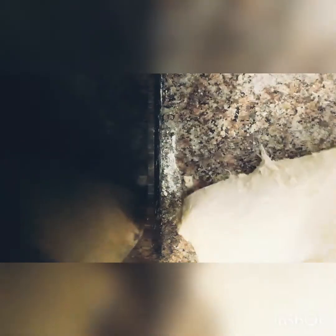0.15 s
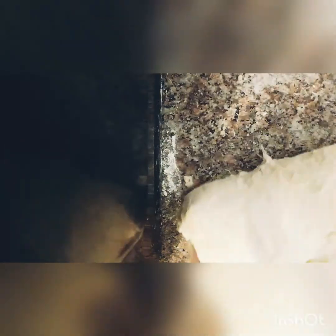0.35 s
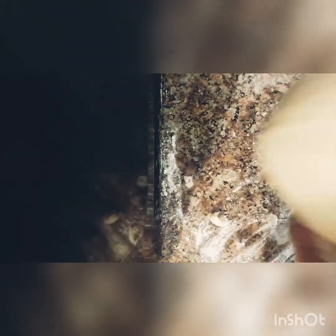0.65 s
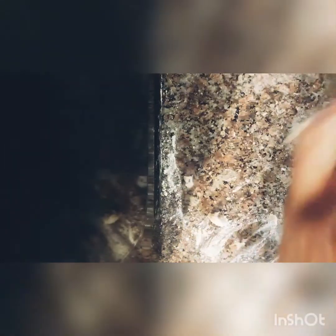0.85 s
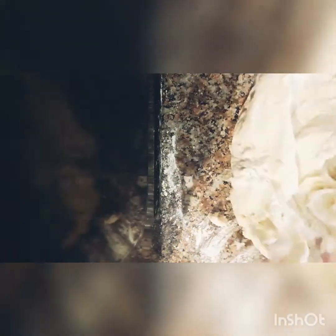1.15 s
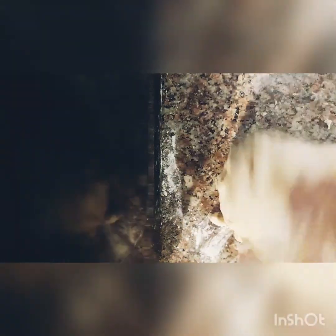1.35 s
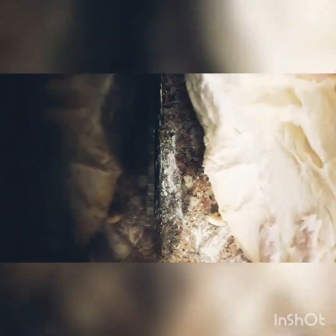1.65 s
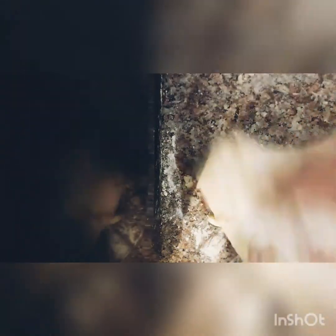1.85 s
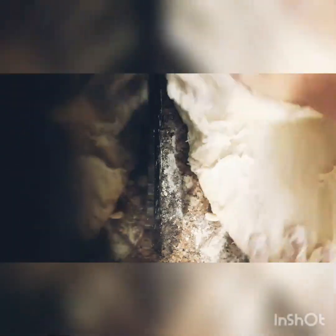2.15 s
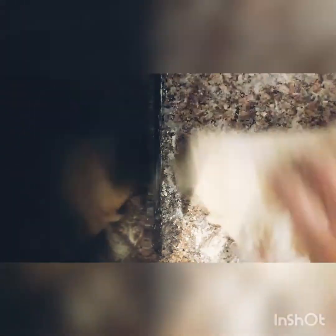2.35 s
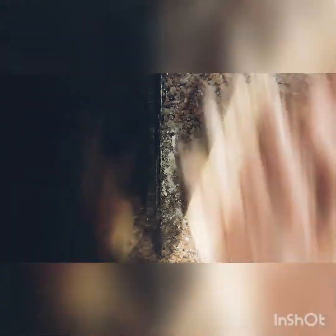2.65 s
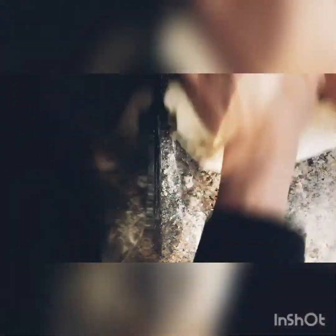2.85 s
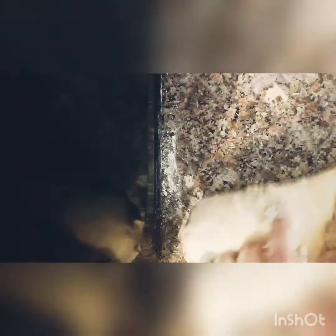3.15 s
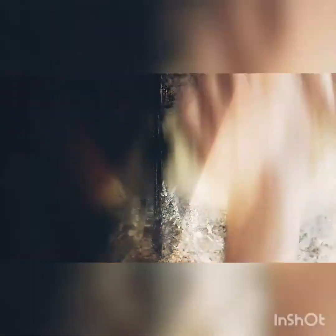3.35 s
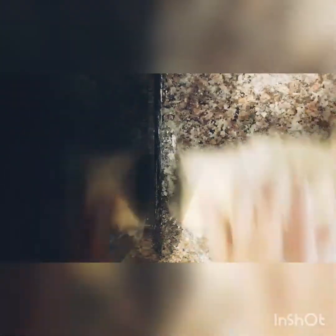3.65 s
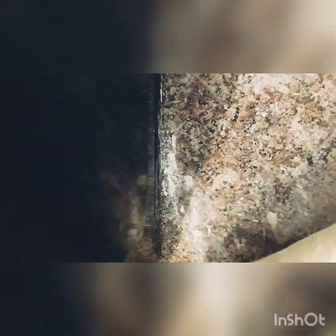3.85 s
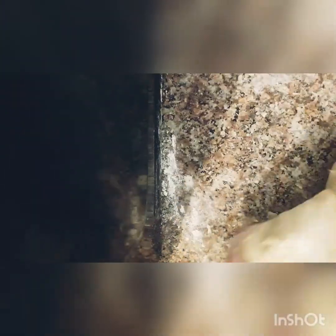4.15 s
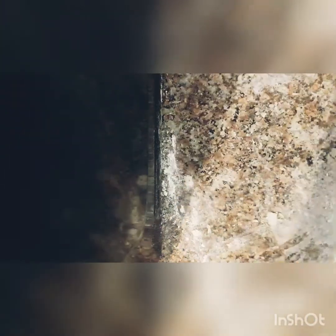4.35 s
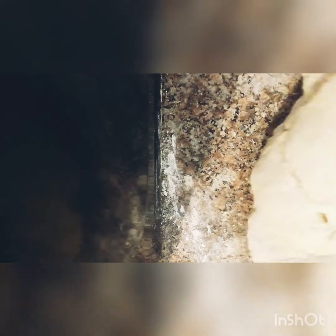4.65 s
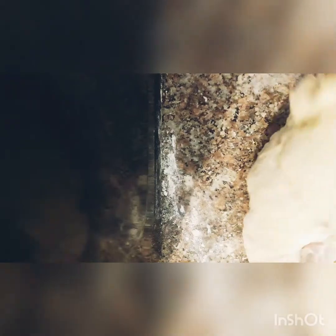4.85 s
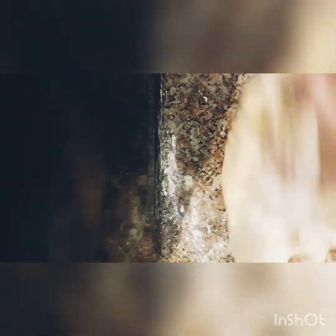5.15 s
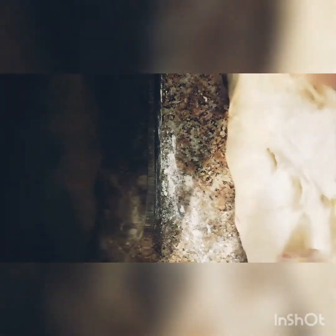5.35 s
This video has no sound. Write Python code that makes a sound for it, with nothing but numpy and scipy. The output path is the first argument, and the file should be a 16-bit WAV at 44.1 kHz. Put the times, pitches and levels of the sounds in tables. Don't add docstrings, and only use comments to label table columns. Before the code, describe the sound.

In a bare, echoing kitchen a steady airy hiss runs throughout. After a second of faint, floury rubbing, a lump of dough lands on stone again and again, in dull thumps, some with damp slaps. The strongest hits come near 2.2 and 4.6 seconds, with gentle drops at the end. A phone microphone picks it up, slightly dull on top.

```python
import sys
import numpy as np
from scipy import signal
from scipy.fft import rfft, irfft, next_fast_len
from scipy.io import wavfile
from scipy.ndimage import uniform_filter1d, map_coordinates

SR = 44100
rng = np.random.default_rng(int(sys.argv[2]) if len(sys.argv) > 2 else 0)


def gain_from_db(level_db):
    decades = np.asarray(level_db, float) / 20
    return 10 ** decades


def persist_wave(psi):
    counts = np.round(np.clip(psi, -1, 1) * 32767).astype(np.int16)
    wavfile.write(sys.argv[1], SR, np.atleast_2d(counts).T)


N = 242578
ECHO_SAMPLES = 40000


def unit(x):
    return x / np.sqrt(np.mean(x ** 2) + 1e-20)


def along(points, hz, column=1):
    p = np.transpose(points)
    return np.interp(np.log(hz + 1), np.log(p[0]), p[column])


def wobble(rate):
    return map_coordinates(rng.standard_normal(int(N * rate / SR) + 4), [np.arange(N) * rate / SR])


def coloured(x, gain):
    m = 2 * next_fast_len(len(x))
    cepstrum = irfft(np.log(gain(np.fft.rfftfreq(m, 1 / SR)) + 1e-6), m)
    cepstrum[1:m // 2] *= 2
    cepstrum[m // 2 + 1:] = 0
    return irfft(rfft(x, m) * np.exp(rfft(cepstrum)), m)[:len(x)]


def add(track, s, x):
    part = track[round(s * SR):][:len(x)]
    part += x[:len(part)]


# (time [s], peak level [dB], cabinet boom [dB], deep push [dB])
LANDINGS = [(0.95, -17.5, 5.5, 6), (1.3208, -6.5, 6, 1.5), (1.8017, -7.5, 1.5, 0.5),
            (2.1992, -2.5, -3.5, 6), (2.4907, -16, 7, -22), (3.298, -21.5, 8, 6), (3.7235, -9.5, 0.5, 7.5),
            (4.1314, -30.5, 19.5, 2), (4.5765, -2.5, 2.5, -8), (4.9696, -6, -5, -11),
            (5.321, -28, -0.5, 2.1), (5.438, -24.5, -2, -10)]
# (time [s], peak level [dB], contact corner [Hz], cabinet boom [dB])
PRESSES = [
    (0.9725, -18.5, 1500, 29),
    (1.749, -31.5, 700, -15),
    (4.186, -31.5, 520, 22),
    (4.5645, -12, 700, 13.5),
]


def contacts():
    rows = []
    for s, db, boom_db, deep_db in LANDINGS:
        softer_octaves = 0.09 * min(db + 25, 0)
        rows.append((s, db, 1063 * 2 ** softer_octaves, boom_db, -0.11, deep_db))
    for s, db, corner_hz, boom_db in PRESSES:
        rows.append((s, db, corner_hz, boom_db, -12, 10.5))
    return sorted(rows)


# (frequency [Hz], level [dB])
BODY = [(30, -56), (50, -26.5), (90, -18), (180, -12.5), (300, 2), (400, -8.5), (520, -1), (800, -3.5),
        (1300, 0.5), (2500, 5), (6000, -3), (16000, -16)]


def thuds(room):
    out = np.zeros(N)
    push = -signal.unit_impulse(2048)
    for s, db, corner_hz, boom_db, room_db, deep_db in contacts():
        def gain(f):
            soft = 1 / (1 + (f / corner_hz / 1.143) ** 6.77)
            soft = soft + gain_from_db(-16) / (1 + (f / corner_hz) ** 2.12)
            slab = gain_from_db(8 / (1 + ((f / corner_hz - 0.72) / 0.23) ** 2))
            boom = gain_from_db(boom_db / (1 + (f / 380) ** 3) + deep_db / (1 + (f / 150) ** 4))
            return gain_from_db(along(BODY, f)) * soft * slab * boom

        blow = coloured(push, gain)
        blow = blow / np.abs(blow).max()
        add(out, s, gain_from_db(db) * in_room(blow, room, room_db, room_db - 41.5))
    return out


# (frequency [Hz], level [dB])
SKIN = [(100, -39), (400, -8.5), (1000, 6.5), (2000, 5), (3200, 0.5), (4500, -1), (6500, 1.5), (9000, -5.5),
        (16000, 5.5)]
# (time [s], level [dB], length [s], room share [dB], air pocket [Hz])
SLAPS = [(0.967, -23.5, 0.0053, -16, 2000), (0.972, -19, 0.007, -4, 4420), (1.325, -36.5, 0.031, 0.5, 5140),
         (1.83, -24.5, 0.011, 9.5, 4400), (1.842, -18, 0.031, 0.6, 2800), (1.855, -14, 0.015, -11, 1300),
         (1.882, -13, 0.0026, -7, 2500), (4.991, -21, 0.007, -8, 5600), (1.8, -39, 0.01, 11.5, 3020),
         (2.197, -30, 0.022, 5, 6200), (3.727, -29, 0.033, -3, 3300), (4.56, -25, 0.011, 3.5, 6000),
         (4.584, -23.5, 0.032, 0.5, 3430), (4.966, -25.5, 0.021, 4.5, 5200),
         (5.439, -40.5, 0.013, 6.5, 2180)]


def slaps(room):
    out = np.zeros(N)
    t = np.arange(4096) / SR
    for s, db, length, room_db, pocket_hz in SLAPS:
        shape = np.sin(np.pi * np.minimum(t / length, 1)) ** 0.25
        spray = rng.standard_normal(len(t)) * gain_from_db(9 * rng.standard_normal(len(t))) * shape
        lines = rfft(spray)
        spray = irfft(lines / np.abs(lines) ** 0.6, len(t)) * (shape > 0)
        tilt_db = -6.5 + 2 * np.log2(pocket_hz / 3000)

        def gain(f):
            pocket_db = 5 / (1 + ((f / pocket_hz - 1) / 0.2) ** 2)
            return gain_from_db(along(SKIN, f) + pocket_db + tilt_db * np.log2((f + 50) / 1500))

        spray = coloured(spray, gain)
        spray = spray * np.sqrt(length * SR) / np.linalg.norm(spray)
        add(out, s, gain_from_db(db) * in_room(spray, room, room_db - 7, room_db - 53.5))
    return out


# (time [s], level [dB], length [s], centre [Hz], width [Hz])
RUBS = [
    (0.314, -53, 0.41, 4350, 3080),
    (1.654, -48, 0.059, 4000, 400),
    (2.735, -47.5, 0.18, 4520, 1500),
    (3.638, -52.5, 0.1, 4000, 824),
    (4.46, -69, .1, 4000, 2010),
]


def rubs():
    out = np.zeros(N)
    t = np.arange(N) / SR
    for s, db, length, hz, width_hz in RUBS:
        grit = rng.standard_normal(N) * gain_from_db(1.2 * wobble(300))
        band = unit(coloured(grit, lambda f: 1 / (1 + (2 * (f - hz) / width_hz) ** 2)))
        out += gain_from_db(db) * np.exp(-(2 * (t - s) / length) ** 2) * band
    return out


# (frequency [Hz], level [dB], time to fall 60 dB [s])
MODES_LOW = [(48.5, -1, 1), (107.8, -6.5, 1), (128.7, -8, 0.88), (220.3, -6, 0.95), (289, 0.5, 0.48),
             (323, -3, 0.64), (422, -17, 1), (493, -6, 0.59), (522, -3, 0.47), (550, -38, 0.98),
             (719, -13.5, 1), (774, -10, 0.76), (804.6, -5, 0.66), (858, -4.5, 0.6), (1040, -11, 0.31),
             (1200, -5.5, 0.38), (1345, -6, 0.57), (1560, -11, 0.69), (1647, 0.5, 0.44), (2030, 0, 0.65)]
# (delay [s], level [dB])
WALLS = [(.0037, -6), (.0074, -8), (.0105, -7), (.017, -7), (.025, -8), (.0305, -4), (.0375, -7),
         (.0405, -8), (.056, -7), (.06, -6), (.069, -7), (.0727, -4)]


def in_room(x, room, room_db, modes_db):
    usual_tail, usual_start = room
    t = np.arange(ECHO_SAMPLES) / SR
    same = 0.65
    tail = same * usual_tail + np.sqrt(1 - same ** 2) * diffuse()
    answer = gain_from_db(room_db + 6.5) * tail
    answer[0] += 1
    for late, db in WALLS:
        echo_db = db + min(room_db, 0) + rng.normal(0, 1)
        answer[round((late + rng.normal(0, 0.0002)) * SR)] += gain_from_db(echo_db)
    for (hz, db, t60), start in zip(MODES_LOW, usual_start):
        ring = np.sin(2 * np.pi * hz * t + start + rng.normal(0, 0.56))
        ring = ring * gain_from_db(-60 * t / t60) * (1 - np.exp(-t / 0.0029))
        answer += gain_from_db(db + modes_db + rng.normal(0, 1.16)) * ring
    return signal.fftconvolve(x, answer)


# (frequency [Hz], time to fall 60 dB [s], build-up [s], level [dB])
KITCHEN = [(100, 0.74, 0.034, -9), (400, 0.71, 0.0071, 4.5), (700, 0.68, 0.031, -6.5),
           (1500, 0.67, 0.0027, 0.5), (4000, 0.66, 0.007, 2), (9000, 0.49, 0.017, 1),
           (14400, 0.27, 0.019, -7.5)]


def diffuse():
    hz, t, z = signal.stft(rng.standard_normal(ECHO_SAMPLES), SR, nperseg=128)
    rise = 1 - np.exp(-t / along(KITCHEN, hz, column=2)[:, None])
    fall = gain_from_db(along(KITCHEN, hz, column=3)[:, None] - 60 * t / along(KITCHEN, hz)[:, None])
    lumps = gain_from_db(2.5 * unit(uniform_filter1d(rng.standard_normal(z.shape), 4, 0)))
    tail = signal.istft(z * rise * fall * lumps, SR, nperseg=128)[1][:ECHO_SAMPLES]
    peaks_db = 2.8 * unit(uniform_filter1d(rng.standard_normal(500), 2))
    peaks_hz = np.linspace(0, SR / 2, len(peaks_db))
    tail = coloured(tail, lambda f: gain_from_db(np.interp(f, peaks_hz, peaks_db)))
    return tail / np.linalg.norm(tail)


# (time [s], peak level [dB])
FAINT = [
    (-.1, -17),
    (.33, -20.5),
    (2.899, -18),
    (3.53, -15.5),
]


def murmur_db():
    power = gain_from_db(2 * -62)
    for s, db, *_ in [*LANDINGS, *FAINT]:
        t = np.maximum(np.arange(N) / SR - s, 0)
        fading = gain_from_db(2 * (db - 35 - 60 * t / 1.28))
        power = power + fading * (1 - np.exp(-t / 0.034))
    return 10 * np.log10(power)


# (frequency [Hz], level per Hz [dB])
HISS = [(25, -31), (65, -23), (102, -2), (140, -15), (280, -13.5), (420, -17.5), (750, -9), (1500, -9.5),
        (2600, -10.5), (4500, -11.5), (6000, -5.5), (8000, -3.5), (12000, -10.5), (16000, -7.5)]
# (centre [Hz], width [Hz], lift [dB])
PIPES = [(1810, 330, 12), (3250, 280, 8.5), (6620, 200, 4), (7900, 800, 3), (14570, 260, 7)]
# (time [s], hiss level [dB])
FLOW = [
    (0.0, -48),
    (0.49, -47.5),
    (0.96, -48.5),
    (1.21, -47),
    (1.78, -47.5),
    (2.85, -50),
    (3.95, -45.5),
    (5.5, -46),
]


def background():
    hz, t, z = signal.stft(rng.standard_normal((4, N)), SR, nperseg=2048)
    lift_db = sum(db / (1 + (2 * (hz - centre) / width) ** 2) for centre, width, db in PIPES)

    def above(edge_hz):
        return 1 / (1 + (edge_hz / (hz + 1)) ** 8)

    steps = [np.ones(len(hz)), above(700), above(4200), above(10500), np.zeros(len(hz))]
    shares = np.sqrt(np.abs(np.diff(steps, axis=0)))
    z = z * (gain_from_db(along(HISS, hz) + lift_db) * shares)[:, :, None]
    field = uniform_filter1d(uniform_filter1d(rng.standard_normal(z.shape), 24, 1), 4, 2)
    standing_db = 2.2 * rng.standard_normal((len(hz), 1))
    z = z * gain_from_db(1.1 * unit(field) + standing_db)
    bands = signal.istft(z, SR, nperseg=2048)[1][:, :N]
    flow_db = np.interp(np.arange(N) / SR, *np.transpose(FLOW))
    flow_db = flow_db - flow_db.mean()
    whistle_db = -49 + 0.44 * flow_db
    hiss_db = -46.5 + flow_db
    fizz_db = -42.5 + 0.52 * flow_db
    levels = [murmur_db(), whistle_db, hiss_db, fizz_db]
    return sum(gain_from_db(db + 0.7 * wobble(14)) * unit(band) for db, band in zip(levels, bands))


def scene():
    room = diffuse(), rng.uniform(0, 2 * np.pi, len(MODES_LOW))
    return (thuds(room) + slaps(room) + rubs() + background())[None]


# (frequency [Hz], level [dB])
MIC = [(20, -14), (80, -3), (150, 0), (8500, 0), (9700, -14), (10500, -16), (12000, -13), (13500, -14),
       (16000, -21)]


def microphone(sound):
    heard = coloured(sound, lambda f: gain_from_db(along(MIC, f)))[None]
    return heard / (1 + np.abs(heard) ** 4) ** (1 / 4)


def low_pass(x):
    return signal.sosfilt(signal.butter(12, 15990, fs=SR, output="sos"), x)


def record(dry):
    mix = microphone(dry[0])
    return low_pass(mix)


dry = scene()
out = record(dry)
persist_wave(out)
```